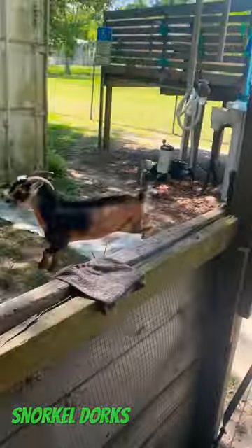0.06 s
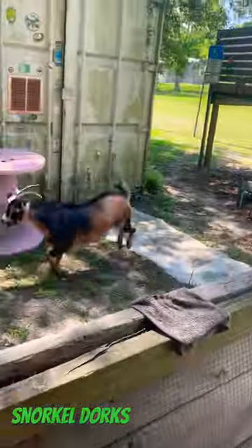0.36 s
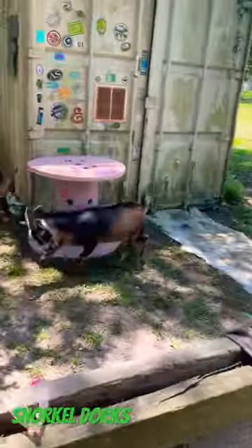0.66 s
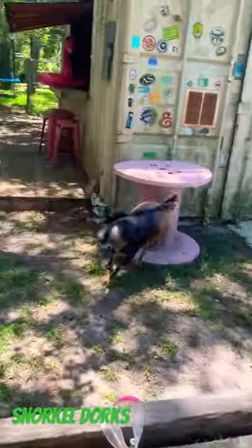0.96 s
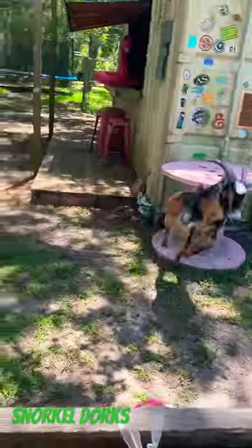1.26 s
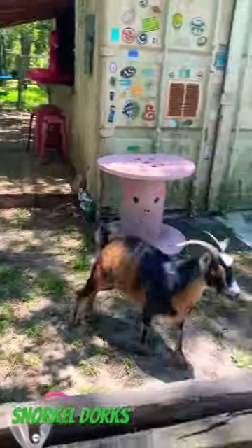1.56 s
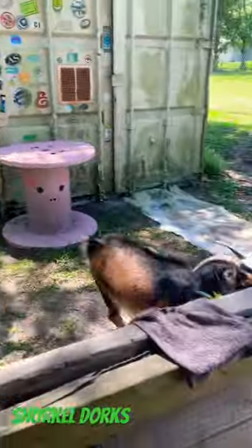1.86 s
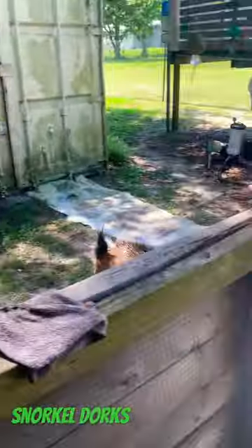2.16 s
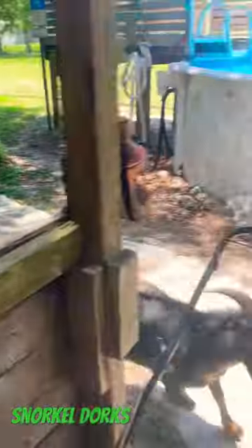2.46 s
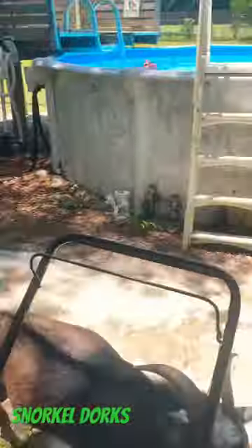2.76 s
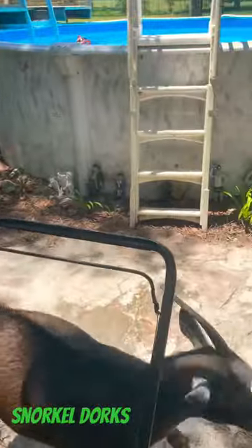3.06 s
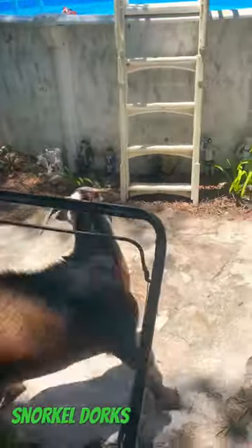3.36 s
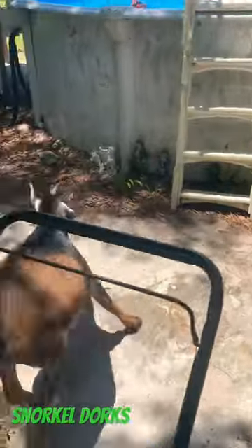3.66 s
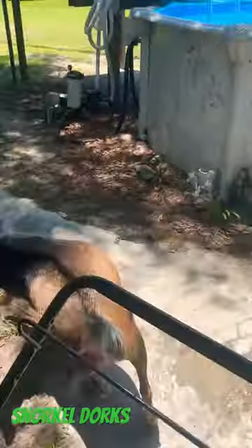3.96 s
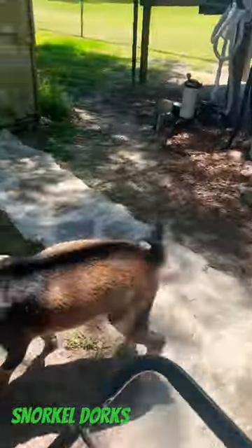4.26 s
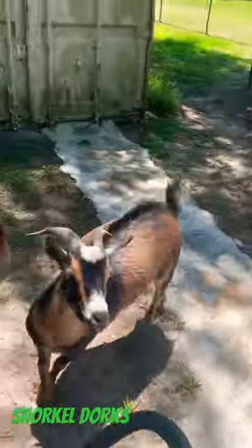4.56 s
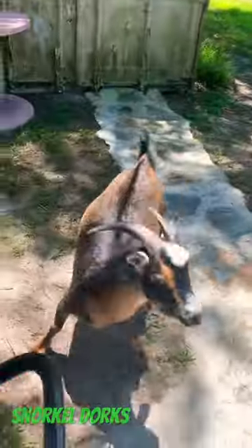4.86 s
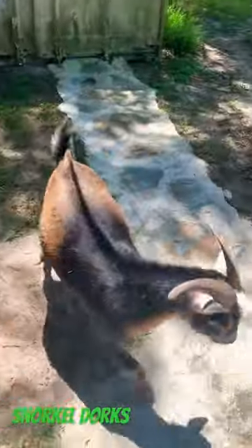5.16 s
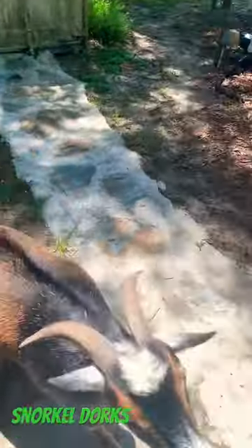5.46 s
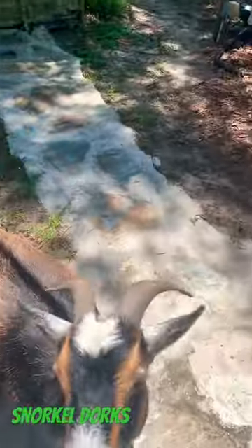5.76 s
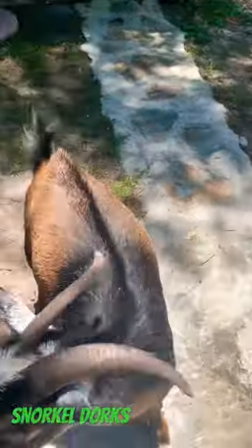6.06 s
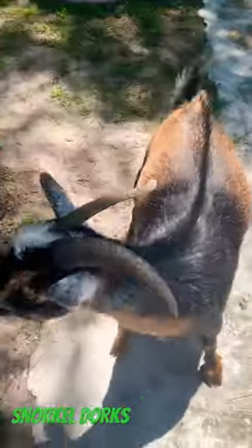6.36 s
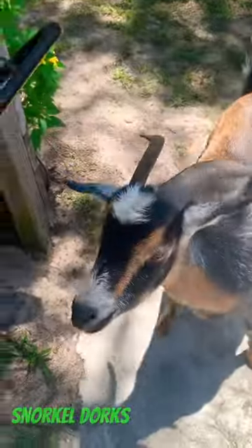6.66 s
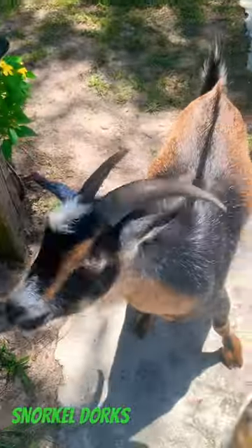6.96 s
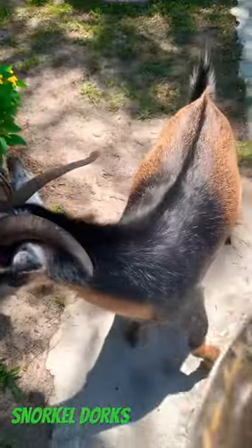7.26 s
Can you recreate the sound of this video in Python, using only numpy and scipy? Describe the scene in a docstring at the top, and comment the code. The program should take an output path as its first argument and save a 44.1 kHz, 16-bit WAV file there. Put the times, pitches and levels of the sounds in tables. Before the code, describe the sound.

A goat moves round a yard, close to a hand-held stereo microphone. Right at the start it puffs through its nose and gives a blubbering, quavering bleat of five quick bursts, lasting to about 0.6 seconds. From 0.8 to 1.1 seconds its hooves clatter on a hollow wooden spool. A shorter bleat comes at 2.2 seconds and ends in a puff. Dull hoof thuds bunch around 2.8 seconds, and a small piece of metal tinks once at 3. Steps then scuff, thud and crackle over grit and dry leaves until about 5.3 seconds. The third and loudest bleat runs from 5.7 to 6.3 seconds, raspy and stuttering, followed by a breathy snort and light shuffling. Throughout there is a low outdoor rumble and a soft wash of air, with a faint pool pump hum that grows slightly. Faint distant rasps drift in near 1.6, 3 and 4.7 seconds.

```python
"""A buck goat, close to a hand-held stereo microphone, trots round a yard and blubbers three bleats.
Each quavering bleat is a run of short bursts from slack, flapping vocal folds, with a puff from the nose.
Its hooves knock on a wooden cable spool, thud, and scuff over grit and dry leaves; metal tinks once.
Further off a pool pump hums behind a low outdoor rumble, and faint rasps come from beyond the fence."""
import sys
import numpy as np
from scipy import signal
from scipy.fft import rfft, irfft, next_fast_len
from scipy.io import wavfile
from scipy.ndimage import uniform_filter1d, map_coordinates

SR = 44100
rng = np.random.default_rng(int(sys.argv[2]) if len(sys.argv) > 2 else 0)


def transcribe(u):
    """Save the signal u as a 16-bit wav file named by the first command-line argument.

    u: samples, shape (n,) or (channels, n), limited to [-1, 1]; the rate is SR.
    q: integer samples, one column per channel.
    """
    v = np.clip(np.atleast_2d(u).T, -1, 1)
    q = np.round(v * 32767).astype(np.int16)
    wavfile.write(sys.argv[1], SR, q)


N = 323253

# Levels are relative, within each table.
# spectra of the outdoor rumble and the wash of air: freq_hz, gain_db
RUMBLE_SPECTRUM = [(25, -36), (42, -52), (50, -6.5), (56, 6), (66, -7), (85, -16.5), (103, 2.5),
                   (113, -5.5), (125, -10), (150, -10.5), (220, -31.5), (400, -58)]
AIR_SPECTRUM = [(100, 10.5), (200, 6), (330, 1), (560, 4.5), (800, -3), (1400, -10.5), (2200, -17),
                (4000, -19), (7000, -22), (15000, -97)]
# the rumble drops as the microphone turns away: time_s, level_db
RUMBLE_LEVEL = [(0, -41), (1.4, -43), (2.2, -44.5), (7.33, -46)]
# how much the air differs between left and right: freq_hz, side_db
AIR_SPREAD = [(60, -29), (200, -9.5), (1000, -3), (3000, 2.5), (6000, -59)]
# rasps beyond the fence: peak_s, half_length_s, centre_hz, level_db
FAR_RASPS = [(1.63, 0.035, 1470, -53), (2.975, 0.11, 1430, -55), (4.693, 0.19, 1420, -58)]
# the pump's whine and rush at the microphone: time_s, level_db
PUMP_LEVEL = [(0, -52), (3.4, -52), (4.4, -44.5), (5.2, -46), (7.33, -55)]
# the motor's whine: pitch_hz, level_db
PUMP_WHINE = [(481.4, -3), (582.7, -7.5)]
# water rushing in the pump housing: centre_hz, width_octaves, level_db
PUMP_RUSH = [(696, 0.048, -13), (1152, 0.016, -14)]
# the motor's growing hum: pitch_hz, final_level_db, rise_db
PUMP_HUM = [(102.2, -50, 2.9), (120.7, -52.5, 5), (183.8, -59.5, 8), (239.7, -55.5, 8.7), (357.8, -53, 21)]
# the yard's echo: freq_hz, t60_s
WALL_DECAY = [(200, 0.041), (1500, 0.19), (4000, 0.12), (12000, 0.073)]

# modes of a small piece of metal: pitch_hz, level_db, t60_s
METAL_MODES = [(8700, -3, .09), (8530, 25, 0.13), (9200, -10, .06), (10700, -7, 0.046), (11420, -14, .06)]
# grit snapping underfoot: start_s, level_db
GRIT_SNAPS = [(1.085, -39), (1.2315, -49), (1.501, -46), (1.568, -41), (1.709, -49), (2.124, -49),
              (2.415, -31.5), (2.511, -29), (2.628, -39), (2.985, -37), (3.14, -46), (3.25, -41),
              (3.5293, -30), (3.609, -28), (3.614, -29.5), (3.725, -46), (3.802, -23), (3.811, -30),
              (3.859, -35), (3.882, -32), (3.932, -18), (3.962, -31), (3.998, -46), (4.034, -36),
              (4.107, -45), (4.137, -48), (4.277, -44), (4.3111, -21.5), (4.3196, -20), (4.617, -44),
              (4.903, -28), (5.069, -43), (5.125, -34), (5.179, -49), (5.237, -49), (5.252, -35.5)]
# spectra of cracking grit, dry leaves and scraped wood: freq_hz, gain_db
GRIT_SPECTRUM = [(2000, -40), (4000, -7), (6000, 6), (15500, -1.5)]
LEAF_SPECTRUM = [(1200, 2.5), (3000, -5.5), (6000, 4.5), (8000, 0), (11000, 3), (15500, -2.5)]
PLANK_SPECTRUM = [(200, -33), (500, 4), (1300, -3.5), (2000, -10), (3500, -17), (5000, -30)]
# scuffs, and a bright rasp of the bleat at 5.8 s: peak_s, level_db, fall_s, treble_db
SCUFFS_AND_RASP = [(.19, -57, .034, -5), (.304, -43, .021, -1.5), (.382, -47.5, .022, -4),
                   (.505, -48, .035, 1), (.873, -45.5, 0.022, -1), (1.347, -55.5, .018, -3),
                   (1.503, -59, 0.033, -2), (1.722, -58.5, 0.047, 3), (2.36, -39, .007, 0),
                   (2.517, -44, 0.011, -2), (2.845, -48.5, 0.065, -2), (2.993, -51, .008, 0),
                   (3.143, -55, 0.013, 9), (3.401, -37, .01, -6), (3.641, -42, 0.016, 0),
                   (3.729, -49, 0.039, 0), (3.93, -49, 0.013, 5), (4.036, -44, 0.0088, 2),
                   (4.155, -60.5, 0.03, 10), (4.195, -45, .024, -4), (4.319, -39.5, 0.02, 2),
                   (4.62, -54.5, 0.033, 5), (4.897, -50, 0.016, 4), (5.075, -56, 0.011, 3),
                   (5.185, -54, 0.013, 4), (5.31, -56.5, 0.033, 7.5), (5.803, -41.5, 0.015, 0),
                   (7.254, -52, 0.02, -3)]
# the faint rustle between steps: time_s, level_db
SHUFFLE_LEVEL = [(0, -67.5), (1.0, -61), (1.15, -68), (1.8, -66.5), (2.0, -73), (2.2, -62.5), (2.7, -59.5),
                 (4.7, -62.5), (5.5, -60.5), (6.4, -56.5), (6.6, -76)]
# spectra of a hoof's blow, its hard rim and the spool's hollow drum: freq_hz, gain_db
KNOCK_SPECTRUM = [(70, -12), (160, 7.5), (230, 9), (350, 4), (820, -1.5), (1300, -11.5), (2500, -20),
                  (6000, -31)]
CLICK_SPECTRUM = [(400, -28), (1000, 2), (1800, -3), (3200, -6), (5500, -25)]
DRUM_SPECTRUM = [(40, 2), (100, 11), (170, -9), (330, -19), (750, -14), (1500, -21), (4000, -51)]
# dull steps and bumps: start_s, level_db, boom_hz, click_db, t60_s
DULL_STEPS = [(0.185, -35, 206, -21, 0.19), (0.372, -31, 260, -20, 0.13), (.993, -34, 233, -33, 0.5),
              (2.791, -24.5, 390, -10, 0.18), (2.833, -27.5, 526, -6.5, 0.15), (2.864, -30, 290, -20, 0.17),
              (2.904, -31.5, 335, -15, 0.16), (3.274, -31.5, 433, -32, 0.24), (3.529, -28, 219, -22, 0.1),
              (3.783, -37.5, 200, -20, 0.15), (4.275, -40, 1700, 5, 0.055), (4.331, -37, 475, -27, 0.094),
              (5.125, -27, 585, -25, 0.088)]
# hooves dragging on wood: peak_s, half_length_s, level_db
HOOF_DRAGS = [(0.802, 0.03, -39), (0.861, .012, -36), (1.093, .012, -51), (2.82, 0.047, -42.5)]
# hooves striking the spool: start_s, level_db, boom_hz, click_db
SPOOL_HITS = [(.775, -34, 795, -17), (.785, -29.5, 870, -5), (.795, -25, 263, -29), (.850, -18, 745, -17),
              (.869, -30, 443, -19), (.912, -23.5, 746, -14.5), (.936, -24.5, 308, -31),
              (.951, -42, 900, -13), (.962, -30, 557, -13), (.970, -22.5, 253, -39), (1.029, -44, 1064, 1),
              (1.0725, -25.5, 704, -17), (1.094, -37, 680, -25)]
# modes of the wooden spool: pitch_hz, level_db, t60_s
SPOOL_MODES = [(243, -28, 0.3), (340, -1, 0.32), (441, 12, 0.2), (593, -6, 0.16), (730, -16, 0.21),
               (1225, -5.5, 0.13), (1680, -21, 0.11), (1940, -10, 0.088), (2584, -35, .16)]

# where the goat's head is, seen from the microphone: time_s, left_over_right_db
HEAD_BEARING = [(.3, -0.5), (2.4, -0.1), (5.8, -1.5), (6.3, 0)]
# spectra of the nostrils and of the vocal tract: freq_hz, gain_db
NOSTRIL_SPECTRUM = [(100, -34), (250, 9), (450, 1), (1000, 7), (1320, 1.5), (1780, -3), (2050, -1),
                    (2800, -3), (4000, -5.5), (7000, -10.5), (12000, -16)]
TRACT_SPECTRUM = [(60, -67), (165, -6.5), (300, -10.5), (550, -4), (900, -4.5), (1280, -3.5), (1660, -5.5),
                  (1940, -17), (2300, -0.5), (2900, -2), (3350, -3.5), (3850, 2), (4300, -9.5), (4750, -9),
                  (6200, -14.5), (9000, -29.5), (15000, -29.5)]
# air blown out round the bleats: peak_s, rise_s, fall_s, level_db
NOSE_PUFFS = [(.0, .01, 0.032, -40.5), (.581, .02, 0.085, -50), (2.135, 0.021, 0.065, -50.5),
              (2.526, 0.012, 0.032, -36), (2.58, 0.025, 0.062, -46.5), (6.318, 0.031, 0.023, -32.5),
              (6.39, 0.047, 0.073, -37.5)]
# the three bleats: start_s, starting_roughness_share, upward_slide_share
BLEAT_STARTS = [(.05, 0.2, 0), (2.2, 0.3, 0.011), (5.65, 0.17, 0.017)]
# bursts of voice, about nine a second: peak_s, rise_s, fall_s, flap_rate_hz, level_db, jaw_hz, throat_db,
# hiss_db, low_formant_hz, middle_formant_hz, high_formant_hz, indirect_share, ground_echo_gain
VOICE_BURSTS = [(.09, 0.021, 0.019, 165.5, -28, 640, -5.5, -3, 1420, 3080, 3780, 0.31, 0.36),
                (.205, 0.046, 0.041, 101.2, -36, 940, -8.5, -12, 1340, 3160, 3780, 0.26, 0.34),
                (0.3173, 0.032, 0.018, 100.2, -34, 1110, 5.5, -28, 1360, 2400, 2980, .65, 0.67),
                (0.4275, 0.026, .014, 114.4, -31.5, 955, -6, -16, 1250, 2980, 3750, 0.37, 0.43),
                (0.5346, 0.024, 0.025, 87.9, -29, 1050, -5, -11.5, 1530, 2640, 3120, 0.4, 0.36),
                (2.238, 0.021, 0.018, 116.7, -28, 620, 4, 2, 1630, 2830, 3450, 0.94, .8),
                (2.352, 0.027, 0.014, 110.1, -23.5, 1040, 4.5, 9.5, 1600, 2880, 4000, 0.54, 0.74),
                (2.4595, 0.026, .015, 121.5, -22.5, 750, -2, -1, 1540, 3100, 3880, .6, 0.54),
                (5.697, 0.013, 0.014, 85.2, -26, 540, 4.5, 22.5, 1240, 2900, 4460, 0.11, 0.5),
                (5.800, .016, 0.025, 108.1, -27, 640, -2, 5.5, 1260, 2850, 3360, 0.2, .3),
                (5.9066, .025, .013, 100.1, -18, 915, -9, -8.5, 1590, 3060, 3990, 0.08, 0.38),
                (6.0173, .022, .014, 108.4, -20, 950, -2.5, -3.5, 1560, 2820, 3570, 0.17, 0.6),
                (6.1353, .026, 0.018, 111.2, -21, 940, -.5, 0.5, 1590, 2920, 3860, 0.34, 0.8),
                (6.263, 0.032, .015, 117.4, -24, 1010, 3.5, 7, 1530, 2580, 3800, 0.45, 0.9)]


def amp(db):
    """Decibels to gain."""
    return 10 ** (np.asarray(db) / 20)


def unit(x):
    """Scale to rms 1."""
    return x / np.sqrt(np.mean(x ** 2) + 1e-20)


def decay(t, t60):
    """A fall of 60 dB every t60 seconds."""
    return amp(-60 * t / t60)


def along(points, hz):
    """Interpolate (freq_hz, value) points on a log axis."""
    freqs, values = np.transpose(points)
    return np.interp(np.log(hz + 1), np.log(freqs + 1), values)


def bump(hz, centre_hz, octaves):
    """A bell on a log-frequency axis."""
    return np.exp(-.5 * (np.log2((hz + 1) / centre_hz) / octaves) ** 2)


def ripple(hz, width_hz):
    """Random peaks and dips along frequency."""
    return map_coordinates(rng.standard_normal(int(SR / width_hz)), [hz / width_hz])


def curve(points):
    """Interpolate (time_s, value) points at every sample."""
    return np.interp(np.arange(N) / SR, *np.transpose(points))


def wobble(rate):
    """A smooth random curve, rate knots a second."""
    return map_coordinates(rng.standard_normal(int(N * rate / SR) + 4), [np.arange(N) * rate / SR])


def swell(t, rise, fall, steep=2):
    """A hump that tops at t = 0; a larger steep gives it harder flanks."""
    return np.exp(-np.abs(t / np.where(t < 0, rise, fall)) ** steep)


def filtered(x, response):
    """Multiply the spectrum of x by response(hz)."""
    n = x.shape[-1]
    size = next_fast_len(n + 8192)
    return irfft(rfft(x, size) * response(np.fft.rfftfreq(size, 1 / SR)), size)[..., :n]


def resonate(x, colour_db, size=4096):
    """Pass x through a minimum-phase body of unit energy, shaped by colour_db(hz)."""
    cepstrum = irfft(np.log(amp(colour_db(np.fft.rfftfreq(size, 1 / SR))) + 1e-6))
    cepstrum[1:size // 2] *= 2
    cepstrum[size // 2 + 1:] = 0
    ring = irfft(np.exp(rfft(cepstrum)))
    return signal.fftconvolve(x, ring / np.linalg.norm(ring))[:len(x)]


def flatten(x, width_hz=500):
    """Level out the broad colour of a sound, keeping its fine grain and its energy."""
    spectrum = rfft(x)
    power = np.abs(uniform_filter1d(np.abs(spectrum) ** 2, max(int(width_hz * len(x) / SR), 1)))
    return unit(irfft(spectrum / np.sqrt(power + 1e-12), len(x))) * np.std(x)


def noise(spectrum):
    """Coloured noise of rms 1."""
    return unit(filtered(rng.standard_normal(N), lambda hz: amp(along(spectrum, hz))))


def band(centre_hz, octaves):
    """A narrow band of noise of rms 1."""
    return unit(filtered(rng.standard_normal(N), lambda hz: bump(hz, centre_hz, octaves)))


def add(track, s, sound):
    """Mix a sound into the track at time s."""
    start = round(s * SR)
    part = sound[max(-start, 0):N - start]
    track[max(start, 0):][:len(part)] += part


def outdoors(air_rise_db_per_s=0.32, waver_db=1.78):
    """All round the yard: low rumble and a slowly growing wash of air, a little different each side."""
    air_db = -46.5 + air_rise_db_per_s * np.arange(N) / SR
    rumble = amp(curve(RUMBLE_LEVEL) + 2) * noise(RUMBLE_SPECTRUM)
    middle = rumble + amp(air_db + waver_db * wobble(3.217)) * noise(AIR_SPECTRUM)
    side = amp(air_db) * filtered(noise(AIR_SPECTRUM), lambda hz: amp(along(AIR_SPREAD, hz)))
    return np.array([middle + side, middle - side])


def far_rasps():
    """Far off, thin raspy sounds drift in from beyond the fence."""
    t = np.arange(N) / SR
    return sum(amp(db) * swell(t - s, half, half) * band(hz, octaves=.15)
               for s, half, hz, db in FAR_RASPS)


def pool_pump(waver_db=2, drift_rad=0.89):
    """Motor tones waver over the rush in the housing, and change in strength as the microphone moves."""
    t = np.arange(N) / SR

    def tone(hz, db):
        level = amp(db + waver_db * wobble(6.7)) * np.sqrt(2)
        return level * np.sin(2 * np.pi * hz * t + drift_rad * wobble(6))

    rush = sum(amp(db) * band(hz, octaves) for hz, octaves, db in PUMP_RUSH)
    hum = sum(amp(rise_db * (t / t[-1] - 1)) * tone(hz, db) for hz, db, rise_db in PUMP_HUM)
    whine = sum(tone(hz, db) for hz, db in PUMP_WHINE)
    return amp(curve(PUMP_LEVEL)) * (rush + whine) + hum


def wall_echo(x):
    """Fence, container and pool wall give a short diffuse answer, 5 ms late."""
    hz, t, spectra = signal.stft(rng.standard_normal((2, SR // 2)), SR, nperseg=256)
    tail = signal.istft(spectra * decay(t, along(WALL_DECAY, hz)[:, None]), SR, nperseg=256)[1]
    delayed = np.pad(x, (SR // 200, 0))
    return signal.fftconvolve(delayed[None], tail / np.linalg.norm(tail[0]), axes=1)[:, :N]


def near_echoes(x, share, t60=0.05, apart=0.4, bounces_per_s=3000):
    """A share of the sound reaches the microphone off ground and boards, differently on each side."""
    t = np.arange(SR // 16) / SR
    bounces = rng.standard_normal((2, len(t))) * (rng.random((2, len(t))) < bounces_per_s / SR)
    middle, side = bounces * decay(t, t60)
    paths = [middle + apart * side, middle - apart * side]
    echoes = np.array([signal.fftconvolve(x, path / np.linalg.norm(path))[:len(x)] for path in paths])
    return np.sqrt(1 - share) * x + np.sqrt(share) * echoes


def metal_tink(start_s=2.985):
    """A small piece of metal is touched once: a bright tick and a short ring."""
    out, t = np.zeros(N), np.arange(SR // 4) / SR
    ring = sum(amp(db) * decay(t, t60) * np.sin(2 * np.pi * hz * t) for hz, db, t60 in METAL_MODES)
    tick = filtered(rng.standard_normal(len(t)) * decay(t, 0.057), lambda hz: hz > 7500)
    add(out, start_s, amp(-32) * (ring / np.abs(ring).max() + amp(2) * tick))
    return out


def grit_snaps(colour_db=1.5):
    """Bits of grit crack under a hoof, each with its own colour and a short crumble of finer grains."""
    out, t = np.zeros(N), np.arange(SR // 10) / SR
    for s, db in GRIT_SNAPS:
        crack, crumble = rng.standard_normal((2, len(t)))
        snap = crack * decay(t, 0.0047) + 0.1 * unit(crumble ** 3) * decay(t, 0.11)
        snap = resonate(snap, lambda hz: along(GRIT_SPECTRUM, hz) + colour_db * ripple(hz, 850))
        add(out, s, amp(db) * snap)
    return out


def scuffs_and_rasp(grain_db=2.5, clump_db=3, patchy_db=2):
    """Clumps of tiny grains: steps crunch leaves and, in the treble, sand; at 5.8 s the bleat rasps."""
    def grains():
        hiss = rng.standard_normal(N)
        return unit(hiss * amp(grain_db * wobble(1500) + clump_db * wobble(70) + patchy_db * wobble(12)))

    t = np.arange(N) / SR
    low_level = high_level = amp(curve(SHUFFLE_LEVEL))
    for s, db, fall, treble_db in SCUFFS_AND_RASP:
        hump = amp(db) * swell(t - s, 0.67 * fall, fall, steep=0.91)
        low_level = low_level + hump
        high_level = high_level + amp(treble_db) * hump
    high_share = lambda hz: np.clip((hz - 7500) / 3000, 0, 1)
    low = filtered(low_level * grains(), lambda hz: np.sqrt(1 - high_share(hz)))
    high = filtered(high_level * grains(), lambda hz: np.sqrt(high_share(hz)))
    return resonate(amp(3) * (low + high), lambda hz: along(LEAF_SPECTRUM, hz))


def hoof_blow(t, boom_hz, click_db, t60, attack_s=0.00046, scrape=0.26):
    """A hoof lands: a damped boom under a short click and a brief scrape, with peak 1."""
    push = rng.standard_normal(len(t)) * decay(t, t60)
    boom = resonate(push, lambda hz: 13 * bump(hz, boom_hz, 0.67) + along(KNOCK_SPECTRUM, hz))
    contact = rng.standard_normal(len(t)) * (decay(t, 0.014) + scrape * decay(t, 0.24))
    click = amp(click_db + 5) * resonate(contact, lambda hz: along(CLICK_SPECTRUM, hz))
    hit = (boom + click) * (1 - np.exp(-t / attack_s))
    return hit / np.abs(hit).max()


def thuds(softness=0.014):
    """Heavier steps and bumps, without a ring; the longer ones sink in more softly."""
    out, t = np.zeros(N), np.arange(SR // 3) / SR
    for s, db, boom_hz, click_db, t60 in DULL_STEPS:
        add(out, s, amp(db + 3) * hoof_blow(t, boom_hz, click_db, t60, attack_s=softness * t60))
    return out


def scrapes(clump_db=4):
    """Between the knocks the hooves drag over gritty wood."""
    t = np.arange(N) / SR
    grains = unit(rng.standard_normal(N) * amp(clump_db * wobble(250)))
    drag = sum(amp(db) * swell(t - s, half, half) for s, half, db in HOOF_DRAGS)
    return resonate(drag * grains, lambda hz: along(PLANK_SPECTRUM, hz))


def spool_drum(rise_s=0.0096, fall_s=0.071):
    """Every blow on the spool feeds a low rumble in its hollow drum."""
    t = np.arange(N) / SR
    power = sum((amp(db - 14) * swell(t - s, rise_s, fall_s, steep=0.51)) ** 2
                for s, db, *_ in SPOOL_HITS)
    return np.sqrt(power) * noise(DRUM_SPECTRUM)


def spool_knocks(board_attack_s=0.0018, board_t60_s=0.089):
    """Hooves clatter on the spool; the struck board sounds its note, the rest ring and rattle briefly."""
    out, t = np.zeros(N), np.arange(SR // 3) / SR
    for s, db, boom_hz, click_db in SPOOL_HITS:
        ring = sum(amp(mode_db + rng.normal(0, 6)) * decay(t, t60) * np.sin(2 * np.pi * hz * t)
                   for hz, mode_db, t60 in SPOOL_MODES)
        board = np.sin(2 * np.pi * boom_hz * t) * decay(t, board_t60_s)
        board *= 1 - np.exp(-t / board_attack_s)
        wood = amp(-6) * ring / np.abs(ring).max() + amp(-1) * board / np.abs(board).max()
        knock = amp(1) * hoof_blow(t, boom_hz, click_db, t60=0.072)
        add(out, s, amp(db) * (knock + wood))
        rattle_s = s + rng.uniform(0.0099, 0.044)
        add(out, rattle_s, amp(db - 10) * hoof_blow(t, boom_hz=245, click_db=-32, t60=0.155))
    return out


def nose_puffs(whistle_db=-9, whistle_hz=1770):
    """The goat blows air through its nose, which half whistles."""
    t = np.arange(N) / SR
    air = unit(noise(NOSTRIL_SPECTRUM) + amp(whistle_db) * band(whistle_hz, octaves=0.1))
    return air * sum(amp(db) * swell(t - s, rise, fall) for s, rise, fall, db in NOSE_PUFFS)


def voice_burst(t, rise, fall, rate_hz, rough, ground_echo_gain, ground_echo_s=.0036, jitter_s=.0005):
    """Each uneven flap of the folds is followed by two quick, weaker echoes off the ground; air rasps."""
    cycle = np.arange(-8, 9)
    late, size, second, third = rng.standard_normal((4, len(cycle)))
    regular = cycle / rate_hz
    slowed = regular * (1 + (regular / .09) ** 2)  # fastest at the top of the push
    times = slowed + jitter_s * late * (cycle != 0)
    arrivals = [(0, 1), (ground_echo_s + jitter_s * second, ground_echo_gain),
                (2 * ground_echo_s + jitter_s * third, ground_echo_gain ** 2)]
    flaps = np.zeros(len(t))
    for delay, gain in arrivals:
        flaps[np.clip(np.searchsorted(t, times + delay), 0, len(t) - 1)] += gain * amp(2.5 * size)
    gate = signal.lfilter([1], [1, -np.exp(-1 / (0.0024 * SR))], flaps)  # air trails each pulse
    air = gate * rng.standard_normal(len(t))
    air *= amp(3.5 * unit(uniform_filter1d(rng.standard_normal(len(t)), size=16)))  # rasp
    # the folds flutter weakly before and after the main push
    flutter = 0.13 * swell(t, rise + 0.012, fall + 0.028, steep=4)
    effort = swell(t, rise, fall, steep=4) + flutter
    flow = np.sqrt(1 - rough) * unit(flaps * effort) + np.sqrt(rough) * unit(air * effort)
    return flow * np.sqrt(np.mean(effort ** 2))


def bleats(opening_s=0.0074, glide_s=.012, fray_per_s=0.36, crack_from_db=-21):
    """Close by, jaw and formants shape each burst; it glides up and brightens as the mouth opens."""
    voice, t = np.zeros((2, N)), np.arange(-SR // 8, SR // 8) / SR
    opened = (1 + np.tanh(t / opening_s)) / 2
    treble = lambda hz: 1.4 * bump(hz, 6700, .6)
    for (s, rise, fall, rate_hz, db, jaw_hz, throat_db, hiss_db,
         low_hz, middle_hz, high_hz, indirect, ground_echo_gain) in VOICE_BURSTS:
        def mouth(hz):
            jaw = 9 * bump(hz, jaw_hz, .23)
            formants = (6.5 * bump(hz, low_hz, .09) + 5 * bump(hz, middle_hz, .11)
                        + 6.5 * bump(hz, high_hz, .09))
            throat = throat_db * bump(hz, 660, 1.0)
            hiss = hiss_db * bump(hz, 6040, 0.31)
            # the loudest flaps crack in the top treble
            crack = 1.1 * max(db - crack_from_db, 0) * (1 - indirect) * bump(hz, 12200, .55)
            return along(TRACT_SPECTRUM, hz) + jaw + formants + throat + hiss + crack

        start_s, first_rough, slide = min(BLEAT_STARTS, key=lambda bleat: abs(bleat[0] - s))
        rough = first_rough + fray_per_s * (s - start_s)  # the voice frays as the bleat goes on
        flow = voice_burst(t, rise, fall, rate_hz, rough, ground_echo_gain)
        # the nose cavities add narrow peaks that shift from burst to burst
        flow = resonate(flow, lambda hz: 1.3 * ripple(hz, 150))
        gliding = SR * (t - t[0] + slide * (np.hypot(t, glide_s) - glide_s))
        # more of the voice is indirect when the head is turned away
        for channel, heard in zip(voice, near_echoes(flow, indirect)):
            heard = flatten(heard)
            dull = resonate(heard * (1 - opened), lambda hz: mouth(hz) - treble(hz))
            bright = resonate(heard * opened, lambda hz: mouth(hz) + treble(hz))
            add(channel, s + t[0], amp(db + 1) * map_coordinates(dull + bright, [gliding]))
    return voice


def scene():
    """The goat and its feet close to the microphone, the yard around them."""
    bearing_db = curve(HEAD_BEARING)
    goat = (bleats() + nose_puffs()) * amp(np.array([bearing_db, -bearing_db]) / 2)
    knocks = spool_knocks() + scrapes() + spool_drum() + thuds()
    crackle = scuffs_and_rasp() + grit_snaps() + metal_tink()
    yard = pool_pump() + far_rasps() + outdoors()
    echo = wall_echo(amp(-15.5) * (goat.mean(0) + knocks))
    crackle = near_echoes(crackle, share=0.074, t60=0.012, apart=0.17)
    slightly_left = amp([[.6], [-.6]])
    return goat + crackle + echo + (knocks + yard) * slightly_left


def record(dry, lag_s=.000234, lead_from_hz=2580, ceiling=.9, low_hz=45, top_hz=16000):
    """Hand-held microphone: left leads right in the treble, peaks are rounded, bass and top are cut."""
    lead = lambda hz: np.pi * lag_s * np.maximum(hz - lead_from_hz, 0)
    channels = filtered(dry, lambda hz: np.exp(1j * np.array([lead(hz), -lead(hz)])))
    rounded = channels / (1 + (channels / ceiling) ** 6) ** (1 / 6)
    return filtered(rounded, lambda hz: np.minimum(hz / low_hz, 1) ** 4 * (hz < top_hz))


dry = scene()
out = record(dry)
transcribe(out)
```